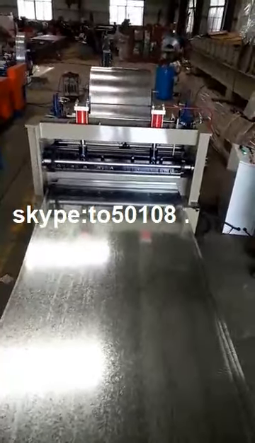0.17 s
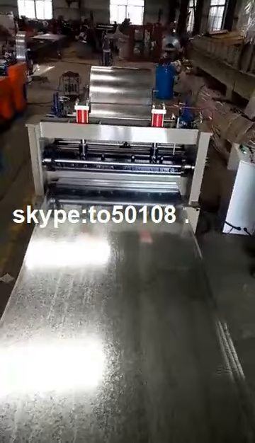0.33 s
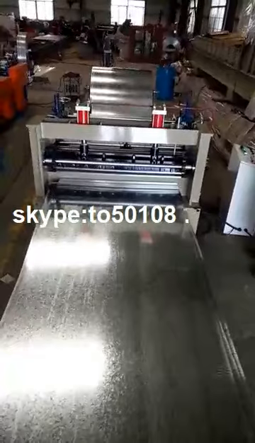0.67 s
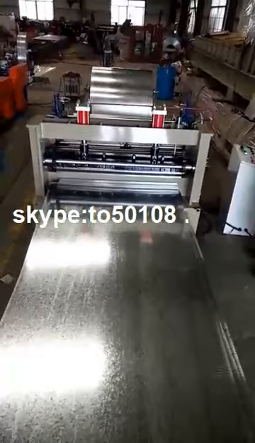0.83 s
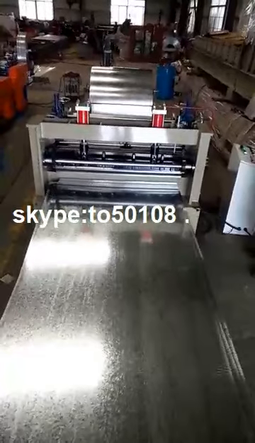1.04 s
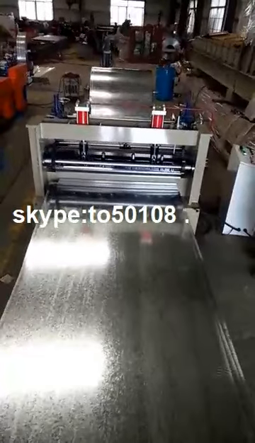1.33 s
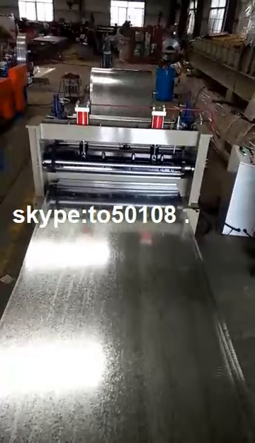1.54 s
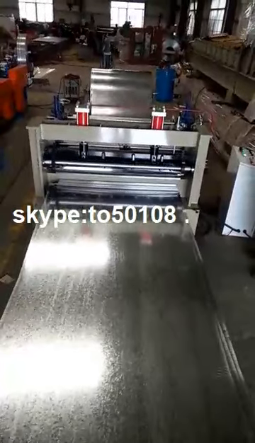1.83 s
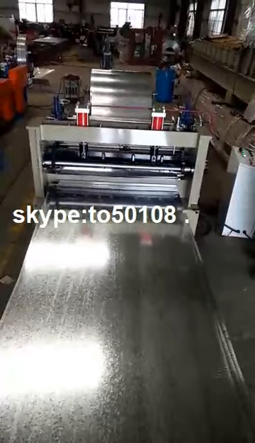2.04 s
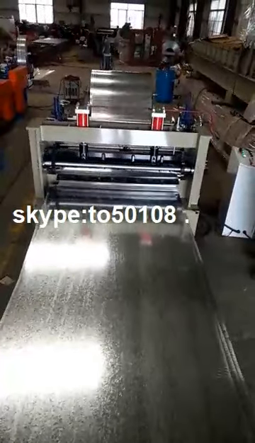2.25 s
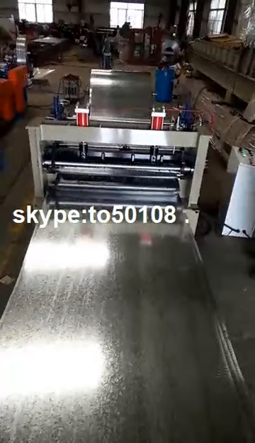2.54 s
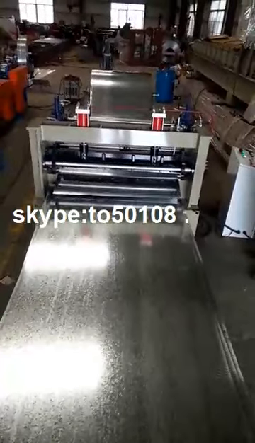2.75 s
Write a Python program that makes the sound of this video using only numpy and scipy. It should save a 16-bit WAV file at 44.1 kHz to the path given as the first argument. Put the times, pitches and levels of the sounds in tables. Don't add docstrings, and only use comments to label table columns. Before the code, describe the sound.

A sheet metal line in a large hall: a distant pipe clang rings first over steady machine roar, then the steel strip starts feeding with hollow booms, roller bumps and short faint scrapes; dull, distant microphone.

```python
import sys
import numpy as np
from scipy import signal
from scipy.io import wavfile
from scipy.ndimage import uniform_filter1d

SR = 44100
rng = np.random.default_rng(int(sys.argv[2]) if len(sys.argv) > 2 else 0)


def bounce(signal):
    frames = np.transpose(np.atleast_2d(signal))
    limited = np.clip(frames, -1, 1)
    pcm = np.round(limited * 32767).astype(np.int16)
    wavfile.write(sys.argv[1], SR, pcm)


def voltage_ratio(level):
    return 10 ** (np.asarray(level, float) / 20)


N = 127449

# (time [s], boom level [dB], slide hiss level [dB])
STRIP_LEVELS = [(0, -28.5, -67), (.06, -33, -52.5), (.35, -39, -80), (1.03, -47, -72.5), (1.07, -39, -59),
                (1.16, -33, -64), (1.4, -29, -61.5), (1.6, -32.5, -61.5), (1.66, -26, -56),
                (1.9, -26, -58.5), (2.052, -26.5, -55.5), (2.2, -24, -55.5), (2.4, -24.5, -72),
                (2.55, -27, -61), (2.721, -25.5, -54), (2.8, -24, -48.5), (2.89, -22, -57)]
# (frequency [Hz], density [dB per Hz])
BOOM_SPECTRUM = [(45, -14.5), (75, 7.5), (300, 7), (700, -4.5), (1500, 0.5), (2300, -20.5), (4900, -25.5),
                 (6200, -46)]
# (frequency [Hz], density [dB per Hz])
SLIDE_SPECTRUM = [(5000, -28.5), (6500, -9.5), (8500, -6), (10000, -10.5), (11200, 2), (12200, 8.5),
                  (14200, -3.5), (15500, -14)]
# (time [s], level [dB], pitch [Hz])
ROLLER_BUMPS = [(1.147, -17.5, 310), (1.201, -27, 135), (1.371, -29, 142.4), (1.649, -20.5, 89),
                (1.712, -27, 264), (1.79, -17.5, 266), (1.858, -21, 102.3), (1.978, -20.5, 202.4),
                (2.16, -23, 73.5), (2.253, -23, 97.4), (2.372, -20.5, 187), (2.788, -15, 248),
                (2.861, -19, 289)]
# (time [s], length [s], level [dB])
EDGE_SCRAPES = [
    (1.64, 0.21, -74),
    (2.146, .22, -49),
    (2.766, 0.18, -48),
    (2.853, 0.076, -50),
]
# (time [s], level [dB])
PIPE_BLOWS = [
    (.047, -7),
    (.062, -3.5),
    (.09, -5),
    (.18, -10),
]
SECOND_OBJECT_HZ = [1158, 1270, 1420, 1545, 1684, 1980, 2214, 2740.4, 2972, 3322, 3402, 4022, 4845]
# (level [dB], t60 [s])
SECOND_OBJECT_RING = [(-12.5, .3), (-1, .4), (-8.5, .3), (-6, 0.13), (-6, .3), (-24, 0.36), (-11.5, 0.83),
                      (-1, 0.45), (0, 0.4), (-10, .25), (-15.5, .3), (-21.5, .25), (-19, 0.37)]
WALL_HZ = [3820, 4691, 5630, 6150, 6588, 7300, 7569, 8200, 8559, 9550, 11300, 11800, 12360, 13200]
# (level [dB], t60 [s])
WALL_RING = [(-7, .3), (-10, .4), (-20, 1.1), (-40, .08), (-21, 1.8), (-36, .3), (-28, 1.4), (-42, .05),
             (-33, 1.8), (-46, .06), (-40, .25), (-42, .1), (-38, .2), (-42, .1)]
# (frequency [Hz], density [dB per Hz])
CRACK_SPECTRUM = [(200, -45), (1000, 2.5), (3000, -1), (5000, -15), (7500, -23), (9500, -38), (12000, -41),
                  (14500, -54.5)]
# (frequency [Hz], t60 [s])
HALL_T60 = [(500, 2.2), (1500, 2.2), (4000, 1.7), (6000, 1.5), (9000, 1.2), (12000, .55)]
# (frequency [Hz], density [dB per Hz])
ROAR_SPECTRUM = [(40, -43), (92, -12.5), (404, -8.5), (756, -0.5), (1380, -4), (3900, -21), (5000, -44),
                 (6200, -48.5)]
# (frequency [Hz], width [Hz], level [dB])
GEAR_WHINES = [(583.5, 9, -43.5), (744.4, 20, -42), (104.8, 15, -47)]
# (frequency [Hz], level of the strongest bin [dB])
GATE_THRESHOLD = [(5000, -81), (5350, -73), (7000, -76), (8500, -79), (10000, -75), (11000, -81),
                  (13500, -83), (15500, -80)]


def evened(x):
    return x / np.sqrt(np.mean(x ** 2) + 1e-20)


def read(points, hz):
    f, value = np.transpose(points)
    return np.interp(np.log(hz + 1), np.log(f + 1), value)


def noise(spectrum, patchy_db, flicker_db):
    frames = N // 256 + 5
    hz = np.fft.rfftfreq(1024, 1 / SR)
    real, imag, patches = rng.standard_normal((frames, 513, 3)).T
    patches = uniform_filter1d(patches, size=8, axis=0)
    patches = evened(uniform_filter1d(patches, size=10, axis=1))
    flicker = evened(uniform_filter1d(rng.standard_normal(frames), size=6))
    level_db = read(spectrum, hz)[:, None] + patchy_db * patches + flicker_db * flicker
    z = (real + 1j * imag) * voltage_ratio(level_db)
    return evened(signal.istft(z, nperseg=1024, noverlap=768)[1][:N])


def resonate(x, hz, width_hz):
    turn = np.exp(2j * np.pi * np.cumsum(hz * np.ones(len(x))) / SR)
    r = np.exp(-np.pi * width_hz / SR)
    return 2 * (turn * signal.lfilter([1 - r], [1, -r], x / turn)).real


def strip():
    t = np.arange(N) / SR
    s, boom_db, hiss_db = np.transpose(STRIP_LEVELS)
    boom = voltage_ratio(np.interp(t, s, boom_db)) * noise(BOOM_SPECTRUM, 0.77, 0.6)
    hiss = voltage_ratio(np.interp(t, s, hiss_db)) * noise(SLIDE_SPECTRUM, 0.89, 0.87)
    return boom + hiss


def bumps():
    rise_s, t60_cycles = 0.014, 19.4
    t, out = np.arange(N) / SR, np.zeros(N)
    for (s, db, hz), phases in zip(ROLLER_BUMPS, rng.random((len(ROLLER_BUMPS), 3))):
        u = np.maximum(t - s, 0)
        modes = zip((0.88, 1, 1.17), phases)
        ring = sum(np.sin(2 * np.pi * (hz * ratio * u + phase)) for ratio, phase in modes)
        out += np.minimum(u / rise_s, 1) * voltage_ratio(db - 60 * u * hz / t60_cycles) * ring
    return out


def scrapes():
    from_hz, to_hz, width_hz = 9300, 7030, 1200
    rise_s, fade_db, squeal_db = 0.02, -7, -6
    t, out = np.arange(N) / SR, np.zeros(N)
    hiss, air = noise(SLIDE_SPECTRUM, 2.0, 0.8), rng.standard_normal(N)
    for s, length_s, db in EDGE_SCRAPES:
        u = np.maximum(t - s, 0) / length_s
        hz = from_hz + (to_hz - from_hz) * np.minimum(u, 1.2)
        squeal = evened(resonate(resonate(air, hz, width_hz), hz, width_hz))
        squeal = voltage_ratio(squeal_db + fade_db * u ** 2) * np.minimum(2 * u, 1) * squeal
        rise = np.clip((t - s) / rise_s, 0, 1)
        out += voltage_ratio(db) * rise * (voltage_ratio(fade_db * u) * hiss + squeal)
    return out


def pipe():
    heard_s, rise_s, ring_db = 1.5, 0.0024, -38
    crack_db, crack_t60_s = -17, 0.076
    twin_split, twin_share = 0.003, 0.55
    t = np.arange(0, heard_s, 1 / SR)
    hz = np.array(SECOND_OBJECT_HZ + WALL_HZ)[:, None]
    mode_db, t60_s = np.transpose(SECOND_OBJECT_RING + WALL_RING)[:, :, None]
    phases = rng.random((len(PIPE_BLOWS), len(hz), 1))
    twin_hz = hz * (1 - twin_split * phases[0])
    crack_noise = noise(CRACK_SPECTRUM, 0.68, 0.3)[:len(t)]
    struck = 0
    for (s, blow_db), phase in zip(PIPE_BLOWS, phases):
        u = np.maximum(t - s, 0)
        pair = np.sin(2 * np.pi * (hz * u + phase)) + twin_share * np.sin(2 * np.pi * twin_hz * u)
        ring = voltage_ratio(-60 * u / t60_s) * pair
        crack = voltage_ratio(crack_db - 60 * u / crack_t60_s) * crack_noise
        struck = struck + np.minimum(u / rise_s, 1) * voltage_ratio(blow_db) * np.vstack([ring, crack])
    heard = hall(struck)
    modes, crack = heard[:-1], heard[-1]
    modes = modes / np.sqrt(np.mean(modes ** 2, axis=1, keepdims=True))
    return np.pad((voltage_ratio(ring_db + mode_db) * modes).sum(0) + crack, (0, N - len(t)))


def hall(x):
    direct_db, build_s = -3, 0.019
    hz, t, z = signal.stft(rng.standard_normal(2 * SR), SR, nperseg=256)
    decay = voltage_ratio(-60 * t / read(HALL_T60, hz)[:, None])
    tail = signal.istft(z * decay, SR, nperseg=256)[1]
    tail = tail * np.minimum(np.arange(len(tail)) / SR / build_s, 1)
    tail = tail / np.linalg.norm(tail)
    return voltage_ratio(direct_db) * x + signal.fftconvolve(x, tail[None], axes=1)[:, :x.shape[1]]


def roar():
    roar_db, hum_db = -26.5, -34.5
    hum_hz, beat_hz, beat_top_s = 298.8, 2.37, 0.31
    t, air = np.arange(N) / SR, rng.standard_normal(N)
    hum = np.sin(2 * np.pi * hum_hz * t) * np.cos(np.pi * beat_hz * (t - beat_top_s))
    whines = sum(voltage_ratio(db) * evened(resonate(air, hz, width_hz)) for hz, width_hz, db in GEAR_WHINES)
    return voltage_ratio(roar_db) * noise(ROAR_SPECTRUM, 1.0, 0.94) + voltage_ratio(hum_db) * hum + whines


def scene():
    return (strip() + bumps() + scrapes() + pipe() + roar())[None]


def gate(x):
    from_hz, jitter_db = 4600, 1.6
    hz, t, z = signal.stft(x, SR, "cosine", nperseg=2048, noverlap=1024)
    peak_power = (abs(z[:1024]) ** 2).reshape(128, 8, -1).max(1)
    band_db = 10 * np.log10(peak_power + 1e-20)
    band_db = band_db + jitter_db * rng.standard_normal(band_db.shape)
    mid_hz = hz[4:1024:8]
    loud = band_db > read(GATE_THRESHOLD, mid_hz)[:, None]
    keep = loud | (mid_hz < from_hz)[:, None]
    z = z * np.vstack([np.repeat(keep, 8, axis=0), keep[-1:]])
    return signal.istft(z, SR, "cosine", nperseg=2048, noverlap=1024)[1][:N]


def top_cut(x):
    return signal.sosfilt(signal.butter(12, 15320, fs=SR, output="sos"), x)


def record(dry):
    bass_cut = signal.butter(3, 62, "high", fs=SR, output="sos")
    mix = gate(signal.sosfilt(bass_cut, dry[0]))[None]
    return top_cut(mix)


dry = scene()
out = record(dry)
bounce(out)
```